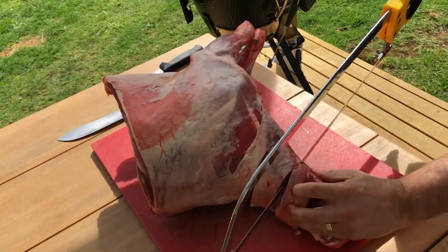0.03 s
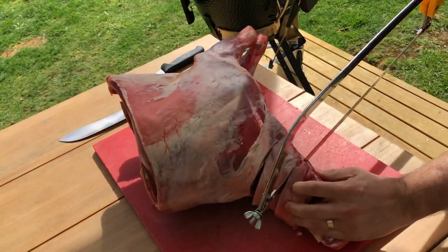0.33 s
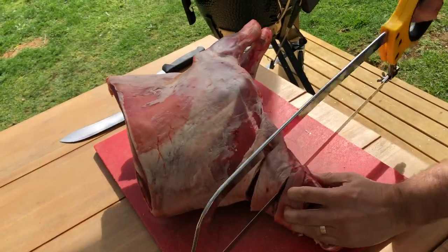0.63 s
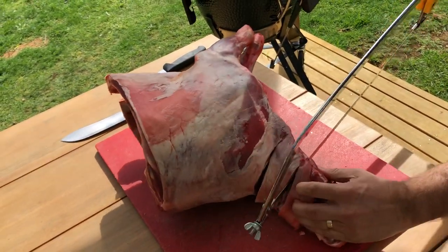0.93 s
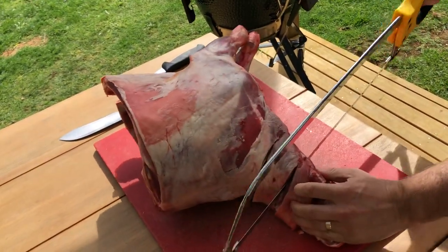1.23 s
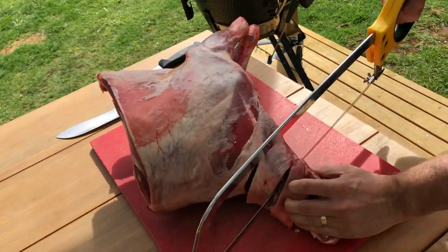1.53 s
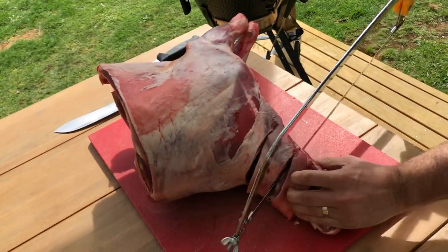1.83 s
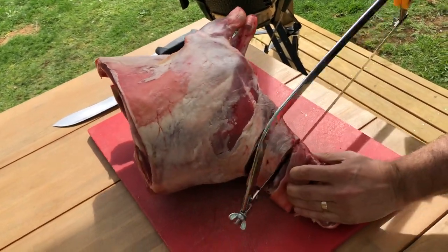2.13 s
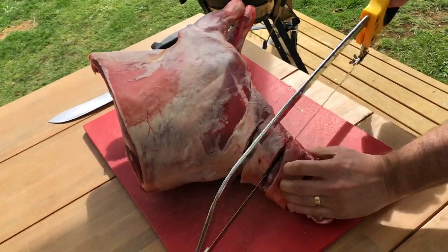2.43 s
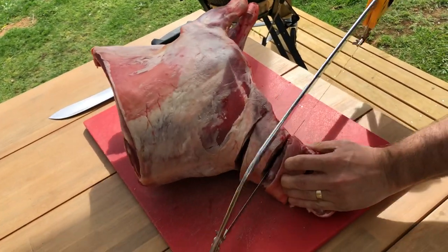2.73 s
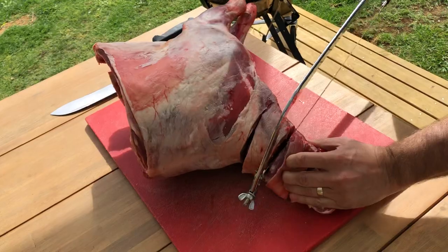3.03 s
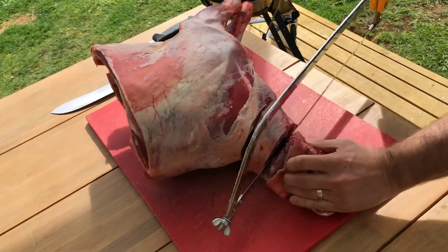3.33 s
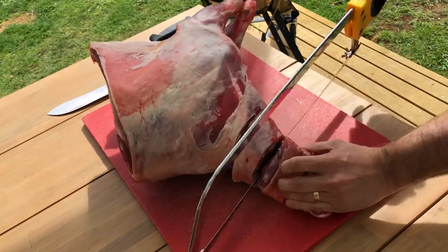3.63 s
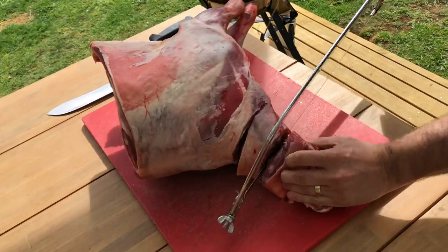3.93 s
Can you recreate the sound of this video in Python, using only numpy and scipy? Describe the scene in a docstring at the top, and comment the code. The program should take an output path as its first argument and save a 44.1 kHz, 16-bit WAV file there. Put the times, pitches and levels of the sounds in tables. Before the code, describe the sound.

Close, rhythmic sawing through bone: light pulls alternate with hard, gritty pushes that ring the steel blade and shake the cutting board. The saw ticks as it turns, while a distant bird whistles faintly over a low garden hush.

```python
"""A saw rasps through bone outdoors: nine hard pushes, each after a lighter pull.
It is a butcher's bow saw cutting a lamb shank on a board on a garden table. The teeth chip the bone
at a rate that follows the hand's speed; they shake the meat and board and ring the blade and frame.
The saw ticks and knocks as it turns round. A bird whistles far off over quiet outdoor air."""
import sys
import numpy as np
from scipy import signal
from scipy.fft import rfft, irfft
from scipy.io import wavfile
from scipy.ndimage import uniform_filter1d

SR = 44100
rng = np.random.default_rng(int(sys.argv[2]) if len(sys.argv) > 2 else 0)


def inscribe(sig):
    """Save sig as 16-bit PCM at rate SR to the path in sys.argv[1].

    A 1-D sig is mono; a 2-D sig holds one channel per row.
    Samples are clipped to [-1, 1] before scaling.
    """
    pcm = np.round(np.clip(np.atleast_2d(sig).T, -1, 1) * 32767)
    wavfile.write(sys.argv[1], SR, pcm.astype(np.int16))


N = 176400
T = np.arange(N) / SR

# The tone of a tiny click. Each row: frequency in Hz, relative level in dB.
CLICK_TONE = [(30, -45), (200, 8), (1500, 0), (3000, -4.5), (4500, 7), (7000, -8), (15000, -6.5)]


def pushes():
    """Hard strokes shake the meat and board, and grunt once as the teeth dig in."""
    # Each row: start, hardest moment and end in seconds, the force at those three in dB, grunt time in
    # seconds, grunt level in dB, then the six tone settings of stroke(), low_hz to hiss_db.
    strokes = [(.394, 0.567, 0.61, -36, -26.5, -33.5, .585, -35, 3300, -16.5, 5460, -5.5, -10.5, -9.5),
               (0.934, 1.037, 1.0906, -31.5, -22.5, -27.5, 1.02, -34, 3300, -10.5, 5250, -9, -9, -7),
               (1.405, 1.517, 1.5645, -26.5, -22.5, -32, 1.488, -26, 3550, -12, 4850, -7.5, -11, -12.5),
               (1.82, 1.878, 1.98, -29.5, -22.5, -31.5, 1.925, -35.5, 3820, -3, 5270, -7.5, -14, -6.5),
               (2.237, 2.328, 2.4, -33, -23.5, -26, 2.3, -30, 3700, -5.5, 5000, -8.5, -9.5, -8),
               (2.646, 2.748, 2.824, -36.5, -23.5, -24, 2.78, -30.5, 3820, -7, 4860, -9.5, -10, -5.5),
               (3.068, 3.126, 3.192, -32.5, -24.5, -31, 3.115, -29, 3960, -9, 5540, -11, -7.5, -6.5),
               (3.501, 3.631, 3.655, -31, -24.5, -33, 3.635, -28, 3930, -5.5, 5040, -7.5, -7.5, -8),
               (3.917, 3.989, 4.13, -34.5, -24.5, -28, 3.965, -37, 4000, -2, 5330, -16, -9.5, -2.5)]
    # The hand's speed, one list per push. Each pair: time in seconds, teeth per second.
    speeds = [
        [(.40, 208), (.55, 370.3), (.58, 298.7), (.615, 151)],
        [(.94, 189), (.975, 324.7), (1.04, 397.7), (1.07, 345), (1.105, 162)],
        [(1.40, 210), (1.445, 312.5), (1.485, 399.7), (1.52, 294.6), (1.58, 201)],
        [(1.81, 219.6), (1.865, 361.2), (1.905, 502.5), (1.935, 293.4), (1.97, 137.2)],
        [(2.25, 158.2), (2.29, 367.5), (2.318, 398.3), (2.36, 294.2), (2.42, 175)],
        [(2.68, 170.4), (2.73, 399.1), (2.77, 417.2), (2.797, 469.6), (2.835, 239.3)],
        [(3.07, 208.2), (3.105, 339.4), (3.155, 433), (3.2, 194.4)],
        [(3.5, 278.3), (3.57, 460.8), (3.622, 412.7), (3.66, 173.7)],
        [(3.91, 182), (3.955, 320.8), (4.0, 474.5)],
    ]
    out = np.zeros(N)
    for row, speed in zip(strokes, speeds):
        start, hardest, end, start_db, top_db, end_db, grunt_at, grunt_db, *tone = row
        span = around(start)
        t = T[span]
        force = effort(t, start, hardest, end, start_db, top_db, end_db, attack_s=.009)
        teeth_hz = uniform_filter1d(np.interp(t, *np.array(speed).T), size=600)
        thrum = gain(-10.5) * force + gain(grunt_db) * swell(t, grunt_at, .018)
        shake = force.max() * (force / force.max()) ** .46
        thud = unit(resonate(board(shake * noise(len(t))), 305, 450)) * np.sqrt(np.mean(shake ** 2))
        ringing = .77 + .24 * swell(t, grunt_at, .064)  # the blade rings harder around the grunt
        out[span] += stroke(t, teeth_hz, force, thrum, ringing, *tone, rub=.33, chip_db=-3.5)
        out[span] += gain(-13) * thud
    return out


def pulls():
    """Lighter return strokes creep in, drag and jam for a moment."""
    # Each row: start and end in seconds, drag in dB, jam time in seconds, jam level in dB, rough top
    # speed in teeth per second, thrum in dB relative to the drag, then the six tone settings of stroke().
    strokes = [(0.196, 0.334, -41, .23, -56, 305, -8, 3030, -7.5, 5120, -9, -7.5, -12),
               (0.759, 0.895, -36.5, .835, -38.5, 365.4, -10, 3000, -10.5, 4900, -10, -8.5, -8),
               (1.202, 1.354, -35, 1.312, -42, 373.6, -15.5, 3560, -10, 5300, -4, -11, -10.5),
               (1.645, 1.773, -37, 1.733, -37, 483, -16.5, 3540, -2.5, 4770, -2.5, -10.5, -2),
               (2.062, 2.197, -40, 2.157, -36, 466.4, -18, 4040, 3.5, 5160, -3, -9.5, -2.5),
               (2.479, 2.619, -41.5, 2.58, -34, 472.6, -15, 3820, 3, 5700, 2, -6, 0.5),
               (2.89, 3.039, -39, 3.002, -37, 448, -20, 3720, -0.5, 4870, -1.5, -6, 2),
               (3.347, 3.445, -32.5, 3.38, -47, 373.8, -11.5, 3760, -6.5, 5060, -9, -7, -5.5),
               (3.775, 3.878, -42.5, 3.855, -39, 489, -10.5, 3760, 0.5, 5030, 0, -8.5, -0.5)]
    out = np.zeros(N)
    for start, end, drag_db, jam_at, jam_db, fast_hz, thrum_db, *tone in strokes:
        span = around(start)
        t = T[span]
        drag = effort(t, start, (start + end) / 2, end, drag_db - 4, drag_db, drag_db - 4, attack_s=.019)
        creep = gain(drag_db - 7.5) * swell(t, start, .048)
        drag = np.maximum(drag, creep)
        progress = np.clip((t - start) / (end - start), 0, 1)
        teeth_hz = fast_hz * (.6 + .43 * np.sin(np.pi * progress))
        jam = swell(t, jam_at, .028)
        force = drag + gain(jam_db) * jam
        thrum = drag * gain(thrum_db)
        ringing = .82 + .18 * jam
        out[span] += stroke(t, teeth_hz, force, thrum, ringing, *tone, rub=.17, chip_db=-4)
    return out


def effort(t, start, hardest, end, start_db, top_db, end_db, attack_s):
    """The teeth catch, pressure swells and eases, then the blade stops short with a light rub."""
    rise = np.clip((hardest - t) / (hardest - start), 0, 1) ** 2.12
    fall = np.clip((t - hardest) / (end - hardest), 0, 1) ** 2.12
    level_db = top_db + (start_db - top_db) * rise + (end_db - top_db) * fall
    attack = np.clip((t - start) / attack_s + .5, 0, 1)
    after = np.maximum(t - end, 0)
    release = np.maximum(np.exp(-after / .009), gain(-16) * np.exp(-after / .052))
    return attack * release * gain(level_db)


def stroke(t, teeth_hz, force, thrum, ringing, low_hz, low_db, high_hz, high_db, bone_db, hiss_db,
           rub, chip_db):
    """Each tooth snaps and throws chips. The bone rings, the blade rings low and high, the meat thrums."""
    teeth_passed = np.cumsum(teeth_hz * (1 + .045 * wander(t, 300))) / SR
    strength = gain(2 * noise(1024))[teeth_passed.astype(int) % 1024]  # each tooth has its own
    bite = strength * (rub + np.exp(-(teeth_passed % 1) / .42)) * gain(.6 * wander(t, 77.3))
    chips, low, high, bone, hiss = (grit(bite) for _ in range(5))
    snap = gain(-8.5) * unit(strength * np.diff(np.floor(teeth_passed), prepend=0))
    blade = gain(low_db) * ring(sliding_blade(low + snap), low_hz, 1240)
    blade += gain(high_db) * ring(sliding_blade(high + snap), high_hz, 1750)
    rasp = gain(chip_db) * chipping(chips) + gain(bone_db) * ring(bone + snap, 1486, 560)
    rasp += gain(hiss_db) * ring(hiss + unit(sliding_blade(hiss)), 10600, 13000)
    pressure = force / force.max()
    dull = signal.lfilter(*signal.butter(1, 6060, fs=SR), rasp)
    rasp = dull + (rasp - dull) * pressure ** .4  # light pressure gives less treble
    lurch = strength * gain(2 * wander(t, 128.4))
    angle = 2 * np.pi * teeth_passed
    tug = unit(resonate(lurch * (np.sin(angle) + gain(-17) * np.sin(2 * angle)), 316, 420))
    return force * (rasp + ringing * blade * pressure ** .5) + thrum * tug


def grit(bite):
    """Grainy noise that follows the bite of the teeth."""
    return unit(bite * noise(len(bite)) * gain(2.2 * np.minimum(rng.exponential(size=len(bite)), 4)))


def chipping(x):
    """Chips of bone breaking off make a broad rasp."""
    # Each row: frequency in Hz, relative level in dB.
    tone = [(30, -16), (100, -23.5), (250, -2.5), (450, 0), (560, -2), (900, 2), (1150, -3), (1700, -5),
            (2100, -3), (2700, -1), (4200, -3), (6300, 3), (7200, -3), (9500, -1.5), (12500, -7.5),
            (15800, -9.5)]
    return colour(x, tone)


def sliding_blade(x, size=1500, change_hz=2.31, decay_s=.0052):
    """The blade's crowded, short-lived notes keep changing as it slides through the cut."""
    angle = 2 * np.pi * change_hz * T[:len(x)]
    fade = np.exp(-T[:size] / decay_s)
    first, second = (signal.fftconvolve(x, noise(size) * fade)[:len(x)] for _ in range(2))
    return np.cos(angle) * first + np.sin(angle) * second


def saw_body(x):
    """The steel frame and the taut blade ring on after whatever shakes them."""
    # Each row of both: pitch in Hz, width in Hz, relative level in dB.
    frame_notes = [(659, 61, 1), (707, 34, -5.5), (786, 13, -25), (897, 6.3, -0.5), (1004, 23, 3),
                   (1220, 45, -9.5), (1308, 16, -2), (1773, 38, -3), (2490, 46, 3), (3290, 120, 0.5),
                   (4140, 190, -5.5), (4840, 13, -24)]
    blade_notes = [(3725, 14, -4), (5093, 8, -5), (5550, 7, -7), (5895, 8, -5)]
    return x + gain(-2.5) * resonances(x, frame_notes) + resonances(x, blade_notes)


def board(x):
    """Meat and board boom together, and give off little below their lowest note."""
    # Each row: pitch in Hz, width in Hz, relative level in dB.
    notes = [(174, 6.2, 8), (209, 33, -8.5), (309, 60, -1.5), (371.7, 64, 2.5), (421, 17, 3)]
    return signal.sosfilt(signal.butter(4, 141, "high", fs=SR, output="sos"), resonances(x, notes))


def snags():
    """Short juddering crunches where the teeth meet hard bone."""
    # Each row: time and rough length in seconds, pitch and width in Hz, relative level in dB.
    crunches = [(1.452, 0.035, 6200, 2000, -25.5), (1.725, .04, 3680, 1300, -27),
                (3.15, 0.024, 880, 500, -32), (3.152, .03, 1440, 490, -28.5),
                (3.145, .025, 5800, 2500, -27), (3.63, .035, 3680, 1500, -27.5)]
    out = np.zeros(N)
    for at, length, hz, width, db in crunches:
        span = around(at - 2 * length)
        t = T[span]
        chips = noise(len(t)) * gain(-.5 * wander(t, 490))
        out[span] += gain(db) * swell(t, at, length / 2) * ring(chips, hz, width)
    return out


def ticks():
    """The blade catches in the cut with a sharp tick."""
    # Each row: time in seconds, relative level in dB.
    hits = [(.076, -35.5), (.165, -32.5), (.395, -20), (.735, -34), (1.396, -19.5), (1.806, -21),
            (2.478, -22.5), (2.662, -25), (3.075, -22), (3.281, -35), (3.345, -27), (3.505, -15),
            (3.661, -43), (3.758, -26.5), (3.837, -26), (3.877, -38)]
    return blows(hits, CLICK_TONE, decay_s=.0025)


def knocks():
    """The saw knocks against the bone at the end of some pushes."""
    # Each row: time in seconds, relative level in dB.
    hits = [(.662, -24), (.677, -48), (3.732, -26.5)]
    # Each row: frequency in Hz, relative level in dB.
    tone = [(30, -33), (100, -13), (320, 2), (550, -9.5), (800, -9.5), (1600, -10), (3000, -22),
            (6000, -46), (15000, -45)]
    return blows(hits, tone, decay_s=.019)


def squeals():
    """One note of the blade takes over for a moment under heavy pressure."""
    # Each row: time and rough length in seconds, pitch in Hz, level in dB.
    notes = [(.578, .05, 3290, -33), (.572, .06, 5100, -34), (1.055, .075, 3320, -33),
             (1.045, .07, 5060, -37), (1.5, .05, 3290, -29)]
    out = np.zeros(N)
    for at, length, hz, db in notes:
        span = around(at - 2 * length)
        t = T[span]
        phase = np.angle(signal.hilbert(ring(noise(len(t)), hz, 120)))  # keeps only the wavering pitch
        out[span] += gain(db) * swell(t, at, length / 2) * unit(np.cos(phase))
    return out


def meat_shifts():
    """The heavy meat rubs on the board, mostly sounding the board's lowest note."""
    # Each row: time and rough length in seconds, level in dB.
    rubs = [(1.98, 0.13, -64), (2.182, 0.062, -42.5), (2.272, 0.031, -30.5), (2.346, 0.09, -31.5),
            (2.61, 0.028, -41.5), (2.693, 0.053, -26.5), (3.283, 0.18, -45.5), (3.422, 0.059, -38.5),
            (3.692, 0.084, -45)]
    loudness = sum(gain(db) * swell(T, at, length / 2) for at, length, db in rubs)
    return loudness * unit(resonate(board(noise(N)), 194, 79))


def crumbs(count=50):
    """Scattered tiny clicks of wet meat and bone crumbs."""
    when, faintness = rng.random((count, 2)).T
    clicks = np.zeros(N)
    clicks[(when * (N - 1)).astype(int)] = gain(-46 - 56 * faintness)
    return colour(clicks, CLICK_TONE)


def bird():
    """A distant bird's thin, gliding whistles, blurred by the garden's echoes."""
    # Each row: start and length in seconds, first, middle and last pitch in Hz, relative level in dB.
    whistles = [(0.252, 0.13, 2950, 3040, 2500, -44), (0.846, 0.11, 2620, 2870, 2850, -39),
                (3.018, 0.07, 2700, 2960, 3080, -44), (3.201, 0.089, 2020, 2130, 2120, -44),
                (3.421, 0.058, 3360, 3140, 2850, -37), (3.756, 0.061, 2720, 3000, 3200, -42),
                (3.884, 0.053, 2950, 3000, 3200, -36)]
    song = np.zeros(N)
    for at, length, first, middle, last, db in whistles:
        progress = np.clip((T - at) / length, 0, 1)
        glide = np.polyval(np.polyfit([0, .5, 1], [first, middle, last], 2), progress)
        hz = glide * (1 + .022 * wander(T, 250))
        song += gain(db) * np.sin(np.pi * progress) * np.sin(2 * np.pi * np.cumsum(hz) / SR)
    song *= gain(3 * wander(T, 120))  # the level flutters
    tail = noise(8192) * np.exp(-T[:8192] / .025)
    echo = signal.fftconvolve(song, tail / np.linalg.norm(tail))[:N]
    return gain(-7) * (song + gain(-4) * echo)


def yard_echo(x, size=22050, top_hz=4740, decay_s=.032):
    """Weak, dull echoes bounce off the table, deck and house."""
    t = T[:size]
    tail = signal.lfilter(*signal.butter(2, top_hz, fs=SR), noise(size))
    tail *= np.exp(-t / decay_s) * (t > .004)
    return gain(-22) * signal.fftconvolve(x, 2 * tail / np.linalg.norm(tail))[:N]


def air():
    """A low outdoor hush rises and falls a little with the breeze."""
    # Each row: frequency in Hz, relative level in dB.
    tone = [(22, -47), (35, -10), (48, -1.5), (100, -2.5), (200, -1.5), (450, -10), (1000, -12),
            (1600, -17), (2400, -16.5), (4000, -15), (7000, -26.5), (15000, -31)]
    breeze_db = 1.5 * wander(T, 9)
    return gain(-50 + breeze_db) * colour(noise(N), tone)


def blows(hits, tone, decay_s):
    """Bursts of noise that start at once and die away."""
    loudness = sum(gain(db) * (T >= at) * np.exp(-np.abs(T - at) / decay_s) for at, db in hits)
    return colour(loudness * noise(N), tone) / 2


def gain(db):
    """Turn decibels into a multiplier."""
    return 10 ** (np.asarray(db) / 20)


def unit(x):
    """Scale to an average power of 1."""
    return x / np.sqrt(np.mean(x ** 2) + 1e-18)


def noise(size):
    """Plain white noise."""
    return rng.standard_normal(size)


def wander(t, per_second):
    """A random drift, roughly between -1 and 1."""
    return np.interp((t - t[0]) * per_second, np.arange(1024), noise(1024))


def swell(t, at, width_s):
    """A smooth bump in time."""
    return np.exp(-((t - at) / width_s) ** 2)


def around(start, size=18000):
    """The samples that hold one stroke or shorter sound."""
    first = int((start - .01) * SR)
    return slice(first, first + size)


def resonate(x, hz, width_hz):
    """Ring at one pitch; a narrower width rings longer."""
    return signal.lfilter(*signal.iirpeak(hz, hz / width_hz, fs=SR), x)


def ring(x, hz, width_hz):
    """Resonate twice for a more focused pitch, at a power of 1."""
    return unit(resonate(resonate(x, hz, width_hz), hz, width_hz))


def resonances(x, notes):
    """Ring at several pitches at once."""
    return sum(gain(db) * resonate(x, hz, width) for hz, width, db in notes)


def colour(x, points, size=4096):
    """Shape bass and treble along (Hz, dB) points; white noise keeps its power."""
    hz, db = np.array(points).T
    freqs = np.maximum(np.fft.rfftfreq(size, 1 / SR), 1)
    curve = gain(np.interp(np.log(freqs), np.log(hz), db))
    # Fold the filter so that nothing sounds ahead of its cause.
    cepstrum = irfft(np.log(curve))
    cepstrum[1:size // 2] *= 2
    cepstrum[size // 2 + 1:] = 0
    response = irfft(np.exp(rfft(cepstrum)))
    return signal.fftconvolve(x, response / np.linalg.norm(response))[:len(x)]


def scene():
    """Saw, board, bird and air, alike in both channels."""
    cutting = pushes() + pulls() + snags() + ticks() + knocks()
    direct = gain(-.5) * saw_body(cutting) + squeals() + meat_shifts() + crumbs() + bird()
    return np.tile(direct + yard_echo(direct) + air(), (2, 1))


def record(dry, top_hz=15950):
    """Cut off the very highest treble."""
    return signal.sosfilt(signal.ellip(10, .2, 80, top_hz, fs=SR, output="sos"), dry)


dry = scene()
out = record(dry)
inscribe(out)
```